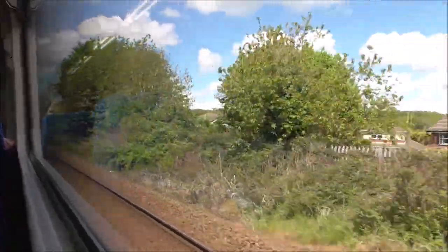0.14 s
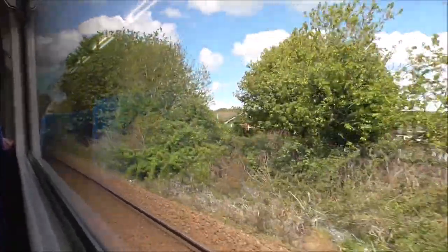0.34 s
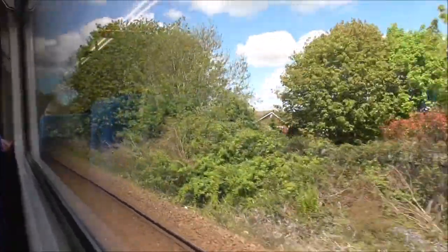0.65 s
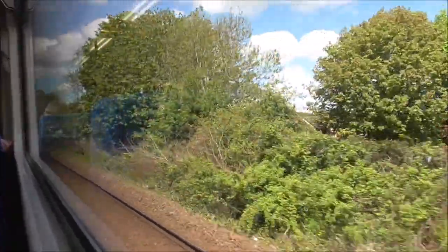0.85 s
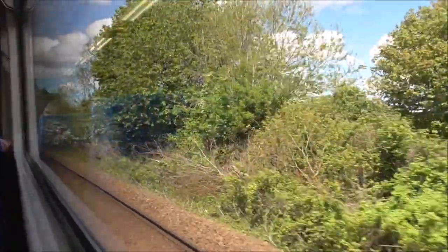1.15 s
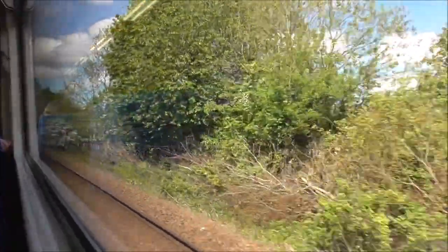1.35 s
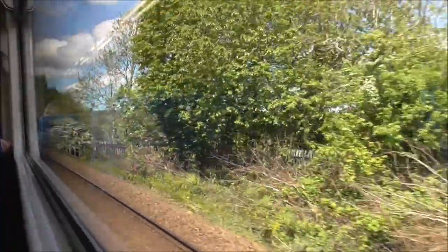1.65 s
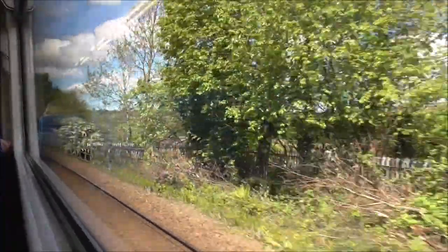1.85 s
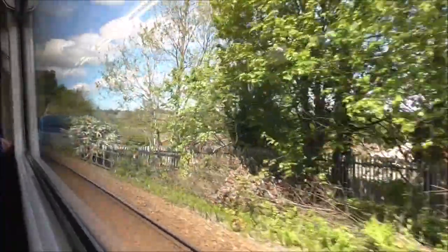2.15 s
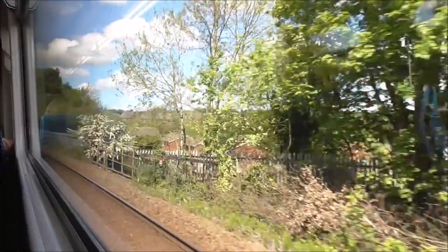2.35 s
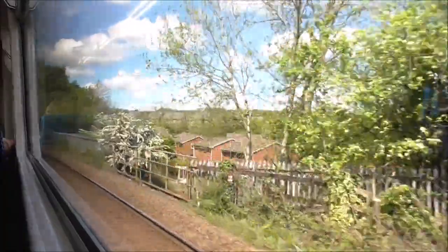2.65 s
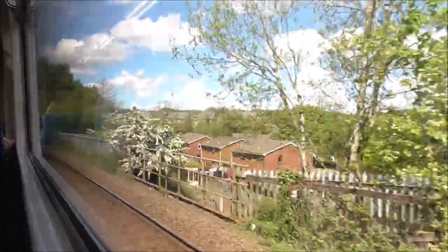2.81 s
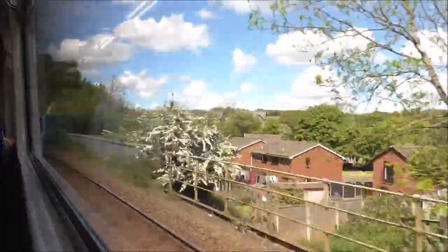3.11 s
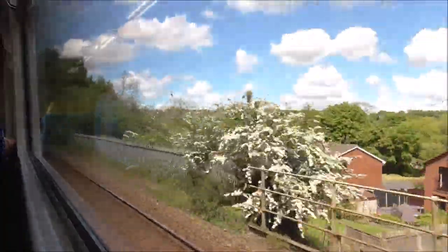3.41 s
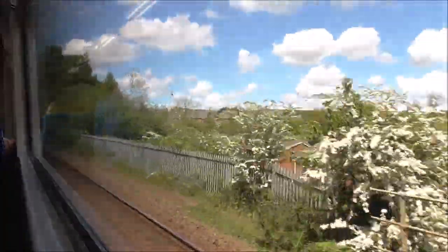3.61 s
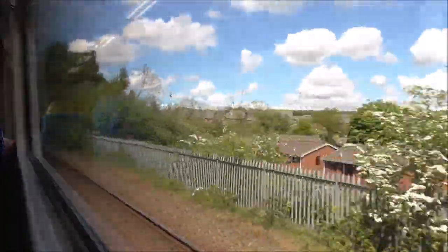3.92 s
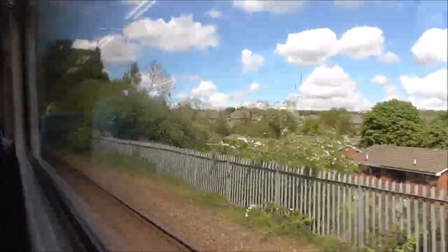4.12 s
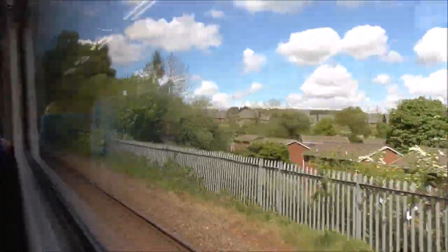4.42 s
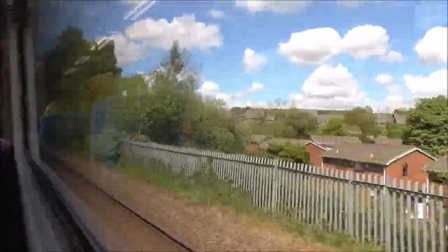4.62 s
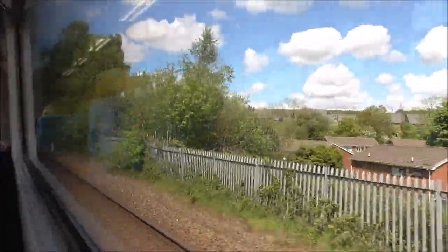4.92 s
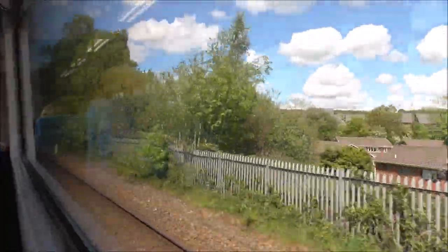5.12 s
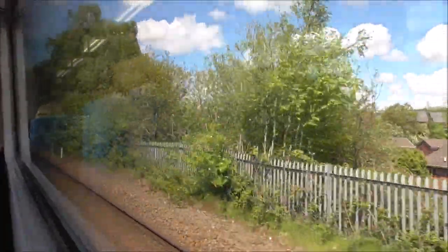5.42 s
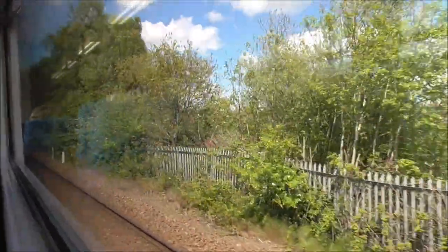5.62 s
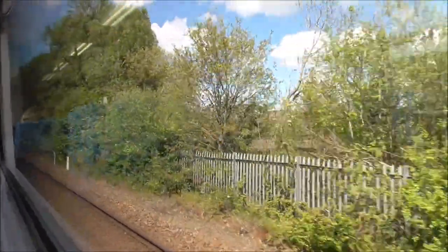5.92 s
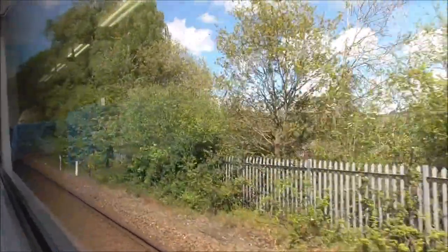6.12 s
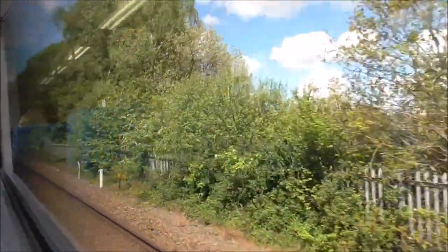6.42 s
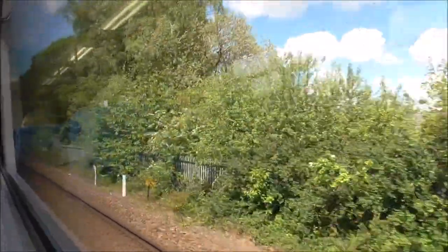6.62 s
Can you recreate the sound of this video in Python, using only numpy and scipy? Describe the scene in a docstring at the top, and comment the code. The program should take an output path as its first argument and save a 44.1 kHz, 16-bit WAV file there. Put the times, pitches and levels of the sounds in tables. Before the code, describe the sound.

A steady low diesel throb fills a train carriage, over rolling wheel roar with a soft jolt, rough patches and a low swelling rail hum.

```python
"""Inside a diesel railcar at steady speed, a six-cylinder engine under the floor throbs at 1800 rpm:
a stack of harmonics of its working cycle, with noise pulsed by the firings. The harmonics of a
second machine beat slowly against it. Shaped noise gives the rumble and roar of the wheels, with
rough stretches and a jolt, and the air hissing along the window, where faint tones whistle and a
short whoosh passes. The rails sing twice, as a wavering sine."""
import sys
import numpy as np
from scipy import signal
from scipy.fft import rfft, irfft, next_fast_len
from scipy.io import wavfile
from scipy.ndimage import uniform_filter1d, map_coordinates

SR = 44100
rng = np.random.default_rng(int(sys.argv[2]) if len(sys.argv) > 2 else 0)


def dump_mix(stems):
    """Bounce the given channels to the path in sys.argv[1] as a 16-bit WAV at rate SR."""
    frames = np.atleast_2d(stems).T  # one column per channel
    limited = np.clip(frames, -1, 1)  # hard clip at full scale
    pcm = np.round(limited * 32767).astype(np.int16)
    wavfile.write(sys.argv[1], SR, pcm)


N = 297675
TIME = np.arange(N) / SR  # s


def amp(db):
    """Level: decibels become an amplitude ratio."""
    return 10 ** (np.asarray(db) / 20)


def unit(x):
    """Normalization: a signal is scaled to rms 1."""
    return x / np.sqrt(np.mean(x ** 2) + 1e-20)


def along(points, hz):
    """Logarithmic frequency: (Hz, value) points are joined by straight lines on a log axis."""
    point_hz, values = np.transpose(points)
    return np.interp(np.log(hz + 1), np.log(point_hz + 1), values)


def wobble(rate):
    """Slow random modulation: a smooth curve through random knots, rate of them per second."""
    coarse = np.linspace(0, N, 2000)
    knots = rng.standard_normal(1024)
    curve = map_coordinates(knots, [coarse * rate / SR], mode="mirror")
    return np.interp(np.arange(N), coarse, curve)


def angle_of(hz):
    """Frequency modulation: phase is the running integral of frequency."""
    return 2 * np.pi * np.cumsum(hz) / SR


def filtered(x, response):
    """Linear filtering: the spectrum is multiplied by a response of frequency."""
    padded = next_fast_len(N + SR // 2)
    spectrum = rfft(x, padded) * response(np.fft.rfftfreq(padded, 1 / SR))
    return irfft(spectrum, padded)[..., :N]


def swell(start, attack, decay, db):
    """Transient envelope: a gain rises exponentially while it decays; db is its level before both."""
    age = np.maximum(TIME - start, 0)
    return amp(db) * (1 - np.exp(-age / attack)) * np.exp(-age / decay)


def passing(middle, length, db):
    """Gaussian envelope: a gain comes and goes over a stretch of rail, halved at its two ends."""
    return amp(db) * .5 ** ((2 * (TIME - middle) / length) ** 2)


# Stereo width. Each row: frequency in Hz, side minus mid in dB.
STEREO_WIDTH = [(25, -14), (60, -19), (130, -21.5), (330, -20.5), (520, -17), (780, -15.5), (1150, 1.5),
                (1800, -4.5), (2800, -2), (4200, -6.5), (6400, -0.6), (9800, 2), (15000, 0)]


def spread(hz):
    """Diffuseness: the angle between mid and side, small where sound reaches both ears alike."""
    return np.arctan(amp(along(STEREO_WIDTH, hz)))


def noise(spectrum, patchy_db):
    """Random excitation: shaped stereo noise, mid at rms 1, with drifting time-frequency patches."""
    bins = signal.stft(rng.standard_normal((2, N)), nperseg=1024)[2]
    patches = uniform_filter1d(rng.standard_normal(bins.shape[1:]), size=6, axis=0)
    patches = uniform_filter1d(patches, size=12, axis=1)
    pair = signal.istft(bins * amp(patchy_db * unit(patches)), nperseg=1024)[1][:, :N]

    def mid_side_response(hz):
        return amp(along(spectrum, hz)) * np.array([np.cos(spread(hz)), np.sin(spread(hz))])

    mid, side = filtered(pair, mid_side_response)
    return np.array([mid + side, mid - side]) / np.std(mid)


# One four-stroke cycle takes two crank turns: mean rate in Hz, start of the firing order in s.
CYCLE_HZ, FIRST_FIRING_S = 14.997, .009
# Cylinders in firing order. Each entry: relative strength in dB.
CYLINDER_STRENGTHS = [-10, -5, 0, -11, -3, -5]
# Floor resonances that delay the orders. Each row: centre in Hz, width in Hz.
FLOOR_RESONANCES = [(143, 10), (260, 48), (331, 14)]
# Strong engine orders. Each row: multiple of the cycle rate, rms level in dB before a common boom.
STRONG_ORDERS = [(3, -49), (6, -32), (7, -32.5), (8, -43), (9, -22), (10, -24), (11, -48), (12, -26.5),
                 (13, -35), (14, -28.5), (15, -33), (16, -34.5), (17, -47.5), (18, -40.5), (19, -47),
                 (20, -39.5), (21, -44.5), (22, -30.5), (24, -33.5), (25, -42), (32, -39.5), (39, -45),
                 (42, -49.5), (46, -47.5), (48, -37)]
# Curve for all other orders. Each row: frequency in Hz, rms level of one order in dB.
WEAK_ORDER_CURVE = [(30, -58.5), (75, -53.5), (400, -55.5), (750, -48.5), (1050, -56), (1300, -65.5)]
# Orders waver more the higher they lie: dB per Hz, up to a limit in dB.
FLUTTER_DB_PER_HZ, FLUTTER_LIMIT_DB = .003, 1.2


def engine(cycle, boom_db=0.07):
    """Fourier series: six unequal firings per cycle shake the floor at multiples of the cycle rate."""
    strong = {round(order): db for order, db in STRONG_ORDERS}
    slots = np.arange(len(CYLINDER_STRENGTHS)) / len(CYLINDER_STRENGTHS)
    out = np.zeros((2, N))
    for order in range(2, 86):
        hz = order * CYCLE_HZ
        # the firing pattern and the floor give only the phases; the tables give the levels
        firings = np.sum(amp(CYLINDER_STRENGTHS) * np.exp(-2j * np.pi * order * slots))
        ring = np.prod([1j * hz * width / (centre * centre - hz * hz + 1j * hz * width)
                        for centre, width in FLOOR_RESONANCES])
        # high orders come by many paths through the body: scattered in phase
        diffuse = hz > 400
        lag = np.angle(firings * ring) + diffuse * rng.uniform(0, 2 * np.pi)
        db = strong[order] + boom_db if order in strong else along(WEAK_ORDER_CURVE, hz)
        flutter_db = min(FLUTTER_DB_PER_HZ * hz, FLUTTER_LIMIT_DB) * wobble(5)
        level = np.sqrt(2) * amp(db + flutter_db)
        # each order meets one ear a little before the other
        ears = spread(hz) * rng.choice([-1, 1]) * np.array([[1], [-1]])
        out += level * np.cos(order * cycle + lag + ears)
    return out


# Noise through the floor, for knock and wheels. Each row: frequency in Hz, relative density in dB.
ROAR_SPECTRUM = [(200, -50), (340, -8), (430, -1.5), (600, 0), (760, 0), (880, -5), (1005, -4),
                 (1120, -7.5), (1300, -15.5), (1500, -21), (1800, -32), (3000, -61)]


def knock(cycle, knock_db=-34, delay_s=0.00239):
    """Amplitude modulation: every firing sends a puff of combustion noise through the floor."""
    delayed = cycle - 2 * np.pi * CYCLE_HZ * delay_s
    gate = (1 + np.cos(len(CYLINDER_STRENGTHS) * delayed)) / 2
    return amp(knock_db) * unit(gate) * noise(ROAR_SPECTRUM, patchy_db=1)


# The second machine: engine order it runs close to, slip below it in Hz,
# moment in s when the accumulated slip phase is zero.
SECOND_ORDER, SLIP_HZ, SLIP_ZERO_S = 6.5, .24, 1.27
# Its harmonics. Each row: multiple of its rate, relative level in dB.
SECOND_HARMONICS = [(1, -20), (2, 0.5), (3, -12), (4, -17)]


def second_drone(cycle, drone_db=-27.0, flutter_db=0.54):
    """Beating: another machine slips against the engine, its second harmonic beating every two seconds."""
    turn = SECOND_ORDER * cycle - 2 * np.pi * SLIP_HZ * (TIME - SLIP_ZERO_S)
    tone = sum(amp(db + flutter_db * wobble(3.1)) * np.cos(round(multiple) * turn)
               for multiple, db in SECOND_HARMONICS)
    return amp(drone_db) * unit(tone)


# Steady rolling: rumble in dB, mean roar in dB, slow easing of the roar in dB per second.
RUMBLE_DB, ROAR_DB, EASING_DB_PER_S = -25.5, -30, 0.2668
# Bass of the rolling wheels. Each row: frequency in Hz, relative density in dB.
RUMBLE_SPECTRUM = [(5, -24), (20, -22), (40, -16), (55, -8), (75, -3), (130, 1.5), (165, 1.5), (215, 1.5),
                   (275, -0.5), (320, 1), (350, -5), (400, -6), (520, -22.5), (900, -74)]
# Growl raised in the coach. Each row: frequency in Hz, relative density in dB.
GROWL_SPECTRUM = [(100, -25), (220, -0.5), (300, -1), (450, -9), (620, -10), (900, -28), (2000, -58.5)]
# Rough stretches of rail. Each row: middle in seconds, length in seconds, growl in dB, roar in dB.
ROUGH_STRETCHES = [(2.06, .28, -25, -31), (2.58, 0.34, -42, -31.5), (2.825, 0.15, -23, -35),
                   (3.15, 0.38, -24, -38), (3.998, .4, -33, -33.5), (4.85, .35, -37.5, -38)]
# Soft jolt from the track. Its entries: start, attack and decay in seconds, level in dB before both.
TRACK_JOLT = (1.99, .006, .025, -20.5)


def wheels(wander_db=1.2):
    """Power summation: rolling, rough rail and a jolt excite rumble, growl and roar through the floor."""
    jolt = swell(*TRACK_JOLT)
    easing_db = EASING_DB_PER_S * (TIME - TIME.mean())
    rolling = amp(ROAR_DB - easing_db + wander_db * wobble(3.85))
    rough_growl = [passing(middle, length, db) for middle, length, db, _ in ROUGH_STRETCHES]
    rough_roar = [passing(middle, length, db) for middle, length, _, db in ROUGH_STRETCHES]
    growl = np.linalg.norm([jolt] + rough_growl, axis=0)
    roar = np.linalg.norm([jolt, rolling] + rough_roar, axis=0)
    out = amp(RUMBLE_DB) * noise(RUMBLE_SPECTRUM, patchy_db=1.5)
    out = out + growl * noise(GROWL_SPECTRUM, patchy_db=1.5)
    return out + roar * noise(ROAR_SPECTRUM, patchy_db=1)


# Air stream at the window. Each row: time in seconds, hiss in dB before a common trim.
AIR_STREAM = [(0.1, -49), (1.97, -48), (2.75, -49), (3.57, -51), (4.66, -50.5), (5.49, -52), (5.87, -50),
              (6.7, -52.5)]
# Mean level of the lower rush in dB, and the share of the hiss's swings in dB that it follows.
RUSH_DB, RUSH_FOLLOWS = -46, 0.67
# Lower rush past the body. Each row: frequency in Hz, relative density in dB.
RUSH_SPECTRUM = [(900, -40), (1500, -6), (1800, -3.5), (2050, 2.5), (2250, 1), (2550, -4), (3050, -7),
                 (3750, -1.5), (4200, -1.5), (4900, -6.5), (5450, -4.5), (5800, -10.5), (7500, -24),
                 (12000, -60)]
# Hiss at the window seal. Each row: frequency in Hz, relative density in dB.
HISS_SPECTRUM = [(3500, -45), (5800, -6.5), (6800, -4), (7900, -1.5), (8600, 1), (9500, 0.5), (11000, -2.5),
                 (12500, -6), (14000, -10.5), (15500, -20.5)]
# Something close to the track sweeps by.
# Its entries: start, attack and decay in seconds, level in dB before both.
PASSING_WHOOSH = (2.77, .025, .17, -44.5)
# Thin whistles. Each row: frequency in Hz, rms level in dB, about which both waver.
WHISTLE_TONES = [(2245, -70.5), (3763, -74), (5378, -63.5), (8592, -82)]


def air(hiss_db=-0.84, jolt_db=-20):
    """Flow noise: one stream rushes past the body, hisses and whistles at the seal; the jolt rustles."""
    seconds, levels = np.transpose(AIR_STREAM)
    stream_db = np.interp(TIME, seconds, levels)
    rush_db = RUSH_DB + RUSH_FOLLOWS * (stream_db - stream_db.mean())
    rush = np.hypot(amp(rush_db), amp(jolt_db) * swell(*TRACK_JOLT))
    hiss = np.hypot(amp(stream_db + hiss_db), swell(*PASSING_WHOOSH))
    flow = rush * noise(RUSH_SPECTRUM, patchy_db=1.0961) + hiss * noise(HISS_SPECTRUM, patchy_db=1.1)
    for hz, db in WHISTLE_TONES:
        turn = angle_of(hz + 3.3 * wobble(40))
        # the two ears waver separately in level
        ears_db = db + 2 * np.array([wobble(9), wobble(9)])
        flow = flow + np.sqrt(2) * amp(ears_db) * np.sin(turn)
    return flow


# Rippled stretches of rail. Each row: middle in seconds, length in seconds, peak rms level in dB.
RIPPLED_STRETCHES = [(3.82, 0.61, -32.5), (5.166, 0.91, -19.5)]
RIPPLE_HZ = 205.3  # mean pitch


def rail_song(flutter_db=-0.5, waver_hz=0.35):
    """Periodic excitation: evenly spaced ripples on the rail head give a wavering hum."""
    tone = np.sqrt(2) * np.sin(angle_of(RIPPLE_HZ + waver_hz * wobble(8.3)))
    stretches = sum(passing(*row) for row in RIPPLED_STRETCHES)
    return stretches * amp(flutter_db * wobble(3.91)) * tone


# Balance between the ears. Each row: frequency in Hz, left minus right in dB.
EAR_BALANCE = [(60, 0.5), (140, 1), (330, 1), (500, 0.5), (770, -2), (1150, -5), (1800, 1), (4200, 1.5),
               (6400, -0.5), (9800, 3.5), (15000, 0)]


def scene():
    """Superposition: all sources meet at a window seat; the governor holds the engine almost still."""
    cycle = angle_of(CYCLE_HZ + 0.0063 * wobble(2.01)) - 2 * np.pi * CYCLE_HZ * FIRST_FIRING_S
    saloon = engine(cycle) + knock(cycle) + second_drone(cycle) + wheels() + air() + rail_song()
    # half of each difference goes to either ear
    return filtered(saloon, lambda hz: amp(along(EAR_BALANCE, hz) * np.array([[.5], [-.5]])))


TOP_HZ = 15500


def record(dry):
    """Band limitation: nothing from the top frequency upward is passed."""
    return filtered(dry, lambda hz: hz < TOP_HZ)


dry = scene()
out = record(dry)
dump_mix(out)
```